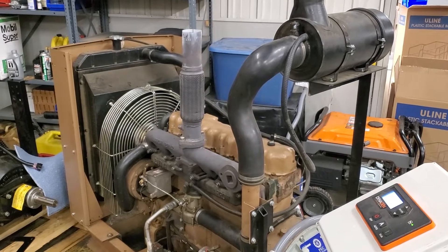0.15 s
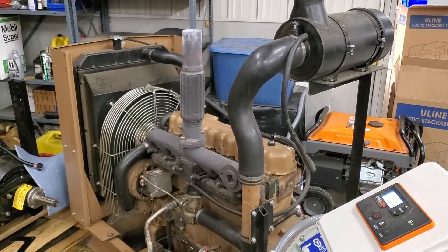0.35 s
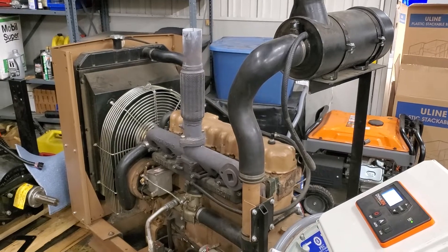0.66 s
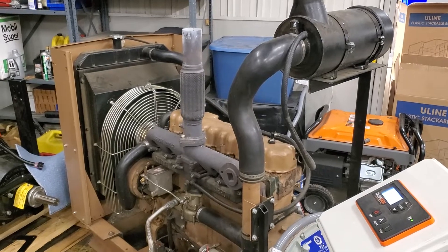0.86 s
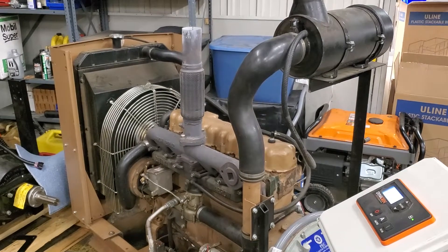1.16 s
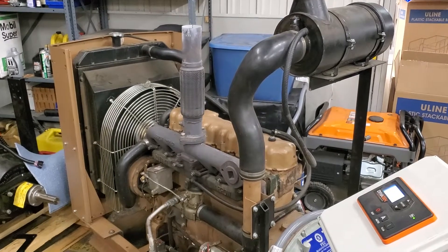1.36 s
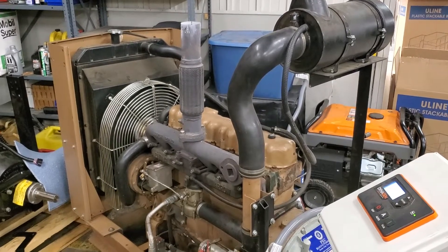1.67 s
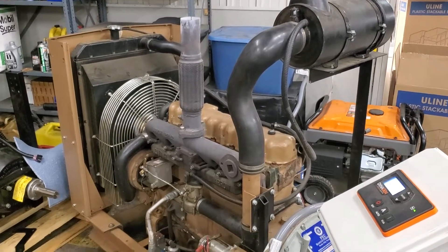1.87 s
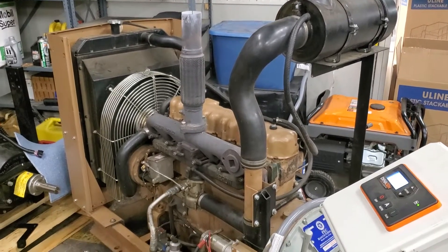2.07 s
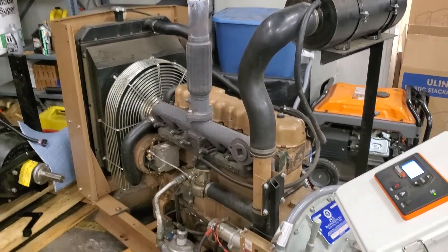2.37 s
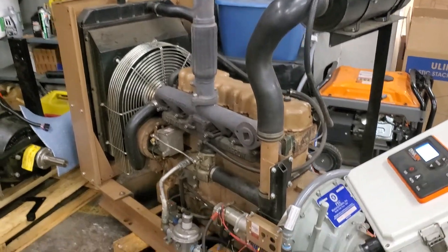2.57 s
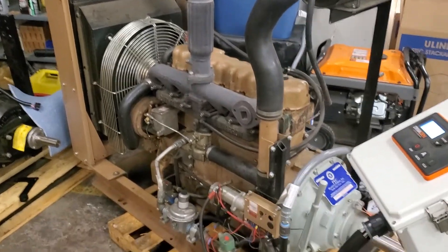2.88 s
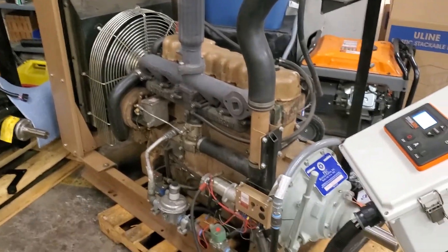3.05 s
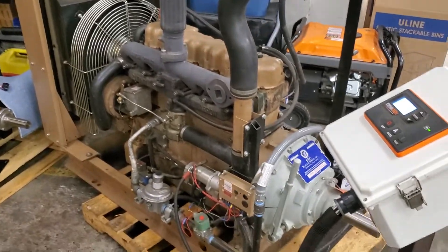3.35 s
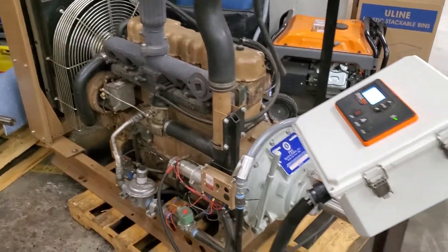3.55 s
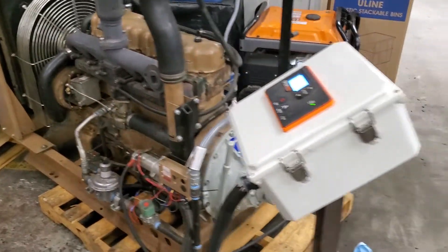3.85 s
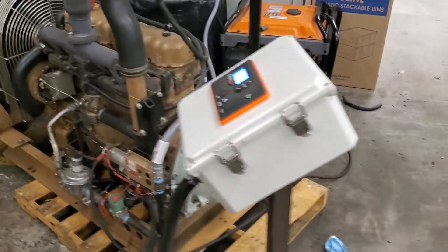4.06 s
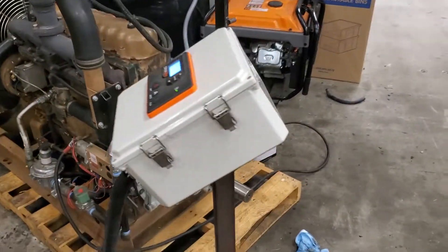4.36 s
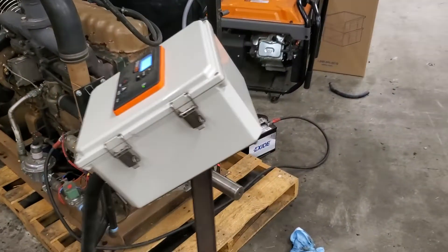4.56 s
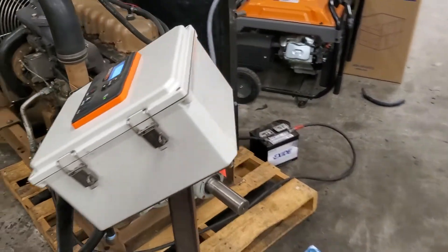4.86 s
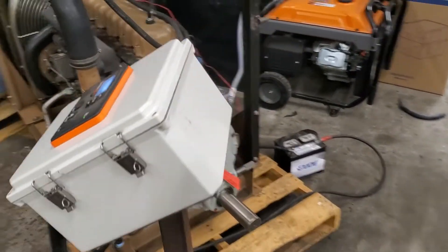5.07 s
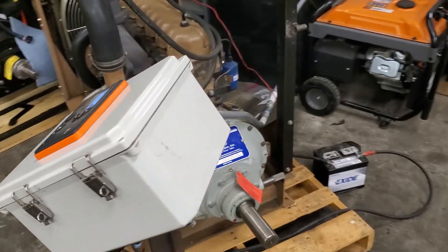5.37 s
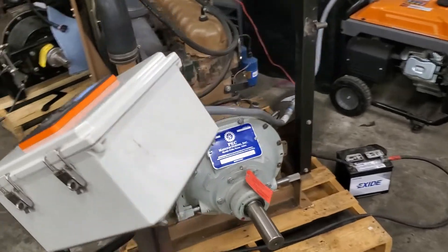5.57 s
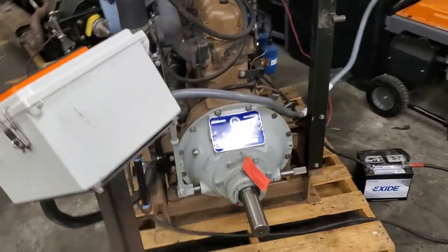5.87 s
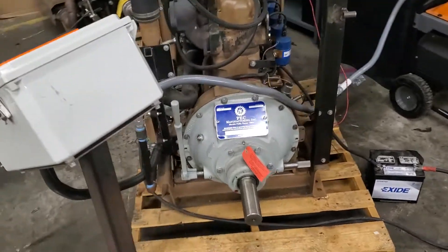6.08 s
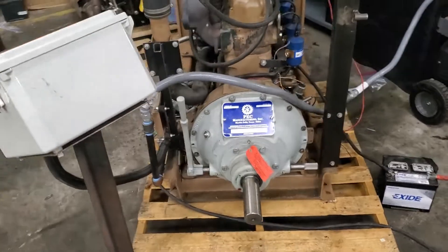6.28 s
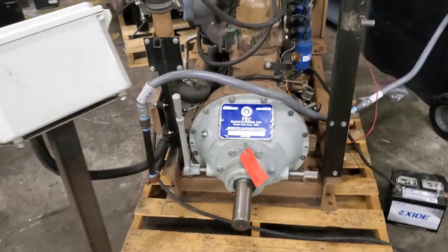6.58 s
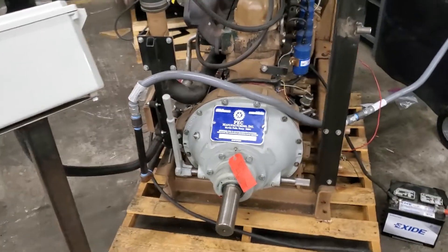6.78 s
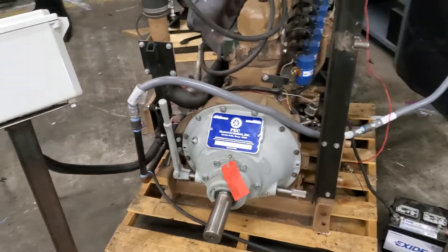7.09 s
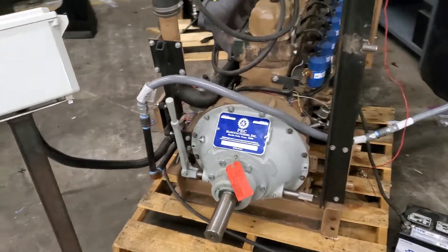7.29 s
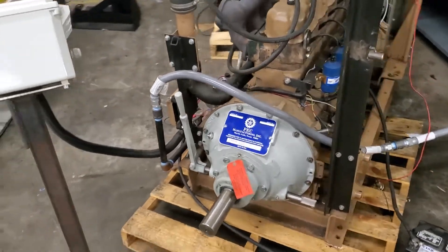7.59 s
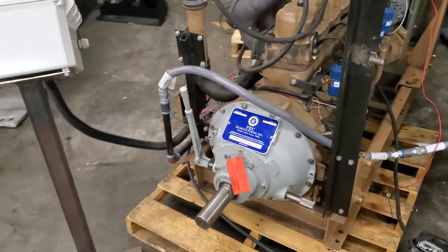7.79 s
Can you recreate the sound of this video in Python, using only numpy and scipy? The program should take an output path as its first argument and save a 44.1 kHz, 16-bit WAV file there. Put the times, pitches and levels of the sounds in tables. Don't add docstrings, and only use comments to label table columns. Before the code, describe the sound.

Loud continuous engine drone with deep exhaust boom, knocking block and rushing fan, its pitch sagging slightly as the listener walks around behind it.

```python
import sys
import numpy as np
from scipy import signal
from scipy.fft import rfft, irfft, next_fast_len
from scipy.io import wavfile
from scipy.ndimage import uniform_filter1d, map_coordinates

SR = 44100
rng = np.random.default_rng(int(sys.argv[2]) if len(sys.argv) > 2 else 0)


def transcribe(signal):
    frames = np.atleast_2d(signal).T
    limited = np.clip(frames, -1, 1)
    pcm = np.round(limited * 32767).astype(np.int16)
    wavfile.write(sys.argv[1], SR, pcm)


def elevation(decibels):
    levels = np.asarray(decibels, float)
    return 10 ** (levels / 20)


N = 349713


def rms_one(x):
    return x / np.sqrt(np.mean(x ** 2) + 1e-20)


def seconds(every=1):
    return np.arange(0, N, every) / SR


def in_time(rows):
    s, *columns = np.transpose(rows)
    return [np.interp(seconds(), s, column) for column in columns]


def at_hz(points):
    line_hz = np.maximum(np.fft.rfftfreq(next_fast_len(N), 1 / SR), 1)
    hz, value = np.transpose(points)
    return np.interp(np.log(line_hz), np.log(hz), value)


def filtered(x, gain):
    size = next_fast_len(N)
    return irfft(rfft(x, size) * gain, size)[..., :N]


def colour(x, spectrum):
    return filtered(x, elevation(at_hz(spectrum)))


def drift(rate_hz):
    r = np.exp(-200 * np.pi * rate_hz / SR)
    noise = rng.standard_normal(N // 100 + 3002)
    slow = signal.lfilter([1], [1, -2 * r, r * r], noise)[3000:]
    return np.interp(np.arange(N) / 100, np.arange(len(slow)), rms_one(slow))


# pitch in Hz, likeness from 0 to 1.
EAR_LIKENESS = [(60, 0.89), (290, 0.94), (640, 0.87), (1400, 0.29), (3100, 0.18), (6800, 0.0071),
                (15000, 0)]


def stereo_noise():
    alike = np.clip(at_hz(EAR_LIKENESS), 0, .999)
    mid, side = filtered(rng.standard_normal((2, N)), np.sqrt([1 + alike, 1 - alike]))
    return np.array([mid + side, mid - side]) / np.sqrt(2)


def contacts(cycles, table, scatter_db):
    trains = np.zeros((len(table), N))
    for train, (part, db) in zip(trains, table):
        at = np.flatnonzero(np.diff(np.floor(cycles - part)) > 0)
        train[at] = elevation(db + scatter_db * rng.standard_normal(len(at)))
    return trains


# crank order, time in
# seconds, depth in dB, half width in seconds.
NODES = [(12, .3, 1, 1.2), (12, 5.55, 5.8, 1.7), (28, 0, 6, .25), (28, 2.35, 9, .45), (28, 4.0, 7, .4),
         (28, 7.6, 8, .9), (30, 1.15, 24, 1.1), (30, 5.5, 9.5, 1.2), (48, 4.9, -7, .35), (53, 7.5, -7, .5),
         (55, 5.1, -5, .5), (57, 7.4, -9, .5), (69, 5.6, -3, .5),
         (15, 4.21, 7.5, 0.93), (18, 2.06, -6.7, 0.41), (20, 5.07, 14.0, 0.91),
              (21, 6.72, -14.0, 1.48), (22, 2.66, -11.8, 1.6), (24, 3.47, -7.1, 1.09),
              (25, 2.92, -7.1, 1.6), (26, 7.44, -9.2, 0.85), (27, 5.48, 14.0, 1.51), (32, 0.88, 14.0, 1.07),
              (36, 7.36, -13.0, 1.37), (41, 2.29, -14.0, 0.88), (48, 2.91, -9.2, 0.41),
              (53, 6.5, 13.7, 1.09), (54, 4.09, 14.0, 1.6), (55, 2.43, -10.3, 0.59),
              (57, 4.95, -14.0, 0.52), (58, 4.65, 13.1, 1.1), (61, 7.14, 8.6, 0.85), (62, 3.7, -8.0, 1.22),
              (63, 4.5, -13.9, 0.55), (64, 3.13, -13.0, 0.45), (65, 1.83, -7.9, 0.57),
              (67, 3.49, 14.0, 0.45), (69, 6.27, -5.5, 0.4), (71, 4.68, -7.7, 0.55), (72, 3.04, -5.5, 0.8),
              (73, 4.72, 14.0, 0.7)]


def standing(order, level_db, every=1):
    s = seconds(every)
    level_db = level_db + 0 * s
    for k, at, depth, width in NODES:
        if k == order:
            level_db = level_db - depth * np.exp(-((s - at) / width) ** 2)
    return level_db


def boom(firings, speed, boom_db, pan_db):
    octave_db = standing(order=12, level_db=-21.3)
    lead = .3 * (speed - 83.0)
    turn = 2 * np.pi * firings + 0.0084 * np.array([[-1], [1]])
    tone = elevation(boom_db) * np.cos(turn) + elevation(octave_db) * np.cos(2 * turn + lead)
    return np.sqrt(2) * tone * elevation(pan_db / 2 * np.array([[1], [-1]]))


# moment as a part of the cycle, knock level in dB.
CYLINDERS = [
    (.08, -2),
    (.265, -1),
    (.41, -5),
    (.6, -4),
    (.77, 0),
    (.91, -1),
]
# multiple of the cycle rate, rms in dB beside, rms in dB
CRANK_ORDERS = [(4, -55.6, -58.5), (7, -54.9, -46.4), (11, -49.7, -58.6), (14, -43.2, -43.9),
                (15, -51.4, -41.5), (16, -42.3, -47.1), (18, -38.1, -36.4), (20, -41.8, -33.1),
                (21, -47.0, -56.3), (22, -49.1, -50.3), (24, -41.7, -47.2), (25, -52.7, -40.6),
                (26, -51.4, -48.6), (27, -53.2, -35.6), (29, -40.5, -53.0), (31, -55.5, -48.2),
                (32, -38.1, -44.6), (33, -60.0, -45.9), (36, -55.3, -55.4),
                (40, -52.7, -40.0), (41, -60.0, -47.1), (42, -58.9, -44.4), (46, -52.6, -48.4),
                (48, -45.2, -46.9), (49, -52.7, -51.7), (50, -49.2, -48.1), (51, -47.0, -60.0),
                (52, -50.8, -60.0), (53, -48.5, -37.2), (54, -52.7, -41.2), (55, -54.6, -43.6),
                (56, -44.8, -43.7), (57, -47.7, -56.5), (58, -47.3, -38.9), (59, -40.8, -48.3),
                (60, -42.0, -53.2), (61, -43.1, -40.0), (62, -46.8, -52.5), (63, -46.1, -51.6),
                (64, -58.5, -50.2), (65, -47.4, -46.6), (66, -47.7, -60.0), (67, -41.0, -41.1),
                (68, -46.9, -55.0), (69, -49.1, -40.9), (71, -50.7, -45.8), (72, -43.4, -48.9),
                (73, -51.7, -42.3), (75, -60.0, -51.5)]


def hum(cycles, accent_db, behind):
    every = 10
    cycles, accent_db, behind = cycles[::every], accent_db[::every], behind[::every]
    paths = np.array([drift(.25)[::every] for _ in range(8)])
    pipe = elevation(standing(28, -36.5, every)) * np.cos(2 * np.pi * 28 * cycles + 3 + .4 * paths[0])
    fifth = elevation(standing(30, -33, every)) * np.cos(2 * np.pi * 30 * cycles + 1 + .4 * paths[1])
    out = (pipe + fifth) * np.ones((2, 1))
    spread = 110 - 4.5 * accent_db
    loud_part = CYLINDERS[4][0]
    for k, beside_db, behind_db in CRANK_ORDERS:
        a, b, c = paths[rng.permutation(8)[:3]]
        phase = 2 * np.pi * k * (cycles - loud_part)
        phase += spread / k * rng.standard_normal() + k / 130 * a
        apart = k / 120 * b * [[1], [-1]]
        level_db = standing(k, beside_db + (behind_db - beside_db) * behind, every)
        out += elevation(level_db + 1.2 * c + .5) * np.cos(phase + apart)
    return np.sqrt(2) * signal.resample_poly(out, every, 1, axis=1)[:, :N]


def hall(x, count):
    length, t60_s = SR // 3, 0.4
    out, spot = np.zeros((2, N)), np.arange(N) / N * (count - 1)
    fade = elevation(-60 * np.arange(length) / SR / t60_s)
    for k in range(count):
        shared, left, right = rng.standard_normal((3, length)) * fade
        echoes = np.array([shared + 0.58 * left, shared + 0.35 * right]) / np.sqrt(np.sum(fade ** 2))
        near = np.flatnonzero(abs(spot - k) < 1)
        heard = x[None, max(near[0] - length, 0):near[-1] + 1]
        wet = signal.fftconvolve(heard, echoes)[:, :heard.shape[1]]
        out[:, near] += wet[:, -len(near):] * np.cos(np.pi / 2 * (spot[near] - k))
    return out


# pitch in Hz, level in dB per Hz.
BLOCK_BESIDE = [(450, -30), (540, -4), (680, -14), (780, -17), (850, 11), (950, 6), (1020, 8.5),
                (1150, -3.5), (1500, -20), (3000, -11), (4500, -34)]
# pitch in Hz, level in dB per Hz.
BLOCK_BEHIND = [(450, -25), (540, -1), (620, -7), (740, -3), (850, 2.5), (950, 2), (1000, -2), (1150, -14),
                (1500, -18), (3000, -29), (4500, -47)]


def knock(cycles, knock_db, accent_db, behind):
    trains = contacts(cycles, CYLINDERS, scatter_db=1.5)
    trains[4] *= elevation(accent_db)
    for train in trains:
        train *= elevation(2.0 * drift(0.98))
    strikes = trains.sum(0)
    blows = (1 - behind) * colour(strikes, BLOCK_BESIDE) + behind * colour(strikes, BLOCK_BEHIND)
    return elevation(knock_db - 4.5) * rms_one(blows + hall(blows, count=6))


# pitch in Hz, level in dB per Hz.
NOISE_BESIDE = [(15, -3), (35, 4), (62, 9), (90, 9), (120, 3), (200, 3), (300, 9), (400, 6), (480, 3),
                (620, 3), (950, 4),
                (1150, 0), (1550, 1), (2250, 1), (2550, 1.5), (2900, -4.5), (3400, -2), (3800, -9),
               (4600, -14), (5600, -19.5), (7500, -23), (9800, -26), (11500, -23.5), (12600, -23),
               (16000, -25)]
# pitch in Hz, level in dB per Hz.
NOISE_BEHIND = [(15, -3), (35, 5), (62, 10), (90, 9), (120, 4), (200, 4), (300, 10), (400, 8), (480, 5),
                (620, 5), (950, 3),
                (1150, 3), (1550, -3), (2000, 0), (2400, -3), (2850, -1.5), (3400, -5.5), (4000, -7.5),
               (4700, -12), (5600, -15), (7500, -16.5), (9800, -23), (11500, -19), (12600, -20),
               (16000, -25)]


def roar(near_db, behind):
    roar_db = -32.5 + near_db
    clear = (1 + np.tanh((seconds() - 3.03) / .05)) / 2
    hiss_db = -51.5 + 2.5 * clear + 0.37 * near_db
    noise = stereo_noise()
    mixed = (1 - behind) * colour(noise, NOISE_BESIDE)
    mixed += behind * colour(noise, NOISE_BEHIND)
    hiss = signal.sosfilt(signal.butter(2, [4200, 9500], "band", fs=SR, output="sos"), mixed)
    lift = elevation(hiss_db - roar_db + 18.5 - 4.2 * behind) - 1
    return (mixed + lift * hiss) * elevation(roar_db + 12.5 + 0.29 * drift(9.7))


# time in seconds, change in dB.
SURGES = [(.01, -11), (.29, -4), (.41, 3), (.58, -4), (.89, -4), (1.11, -4), (1.33, -8), (1.72, -8),
          (1.9, -5), (2.04, 4.5), (2.45, 4), (2.6, -6), (2.9, 4.5), (3.18, 8.5), (3.6, 6), (3.9, 5.5),
          (4.2, 0), (4.36, 4.5), (4.74, -4), (5.12, -4), (5.26, -4), (5.39, 5), (5.5, -5), (5.78, 4.5),
          (6.4, -4), (6.48, 2.5), (6.84, 2), (7.15, -12), (7.3, 5.5), (7.63, -9)]


def howl(cycles):
    fan_order, width_hz, surge_s = 18.9, 16, 0.065
    gusts = drift(width_hz) + 1j * drift(width_hz)
    gusts = gusts / np.sqrt(uniform_filter1d(abs(gusts) ** 2, size=SR // 8))
    level_db = -29 + sum(db * np.exp(-((seconds() - s) / surge_s) ** 2) for s, db in SURGES)
    return elevation(level_db) * np.sqrt(2) * np.real(gusts * np.exp(2j * np.pi * fan_order * cycles))


# moment as a part of the cycle, tick level in dB.
VALVES = [
    (.04, 7),
    (.26, 5),
    (.39, -3),
    (.54, -11),
    (.7, 7),
    (.78, -3),
    (.95, -11),
]


def ticks(cycles):
    r = elevation(-60 / (0.043 * SR))
    clicks = contacts(cycles, VALVES, scatter_db=2.0).sum(0)
    bursts = signal.lfilter([1], [1, -r], clicks + 1e-18)
    metal = [(1200, -18), (3000, -8), (5500, -24), (9800, -27), (11400, -5), (13000, -16), (16000, -10)]
    return elevation(-36.0) * bursts * colour(stereo_noise(), metal)


# time in seconds, firings per second, boom level in dB.
RUN = [(0.0, 86.511, -9.3), (0.45, 85.755, -9.4), (0.81, 86.12, -9.5), (1.62, 85.43, -9.4),
       (1.97, 84.648, -9.6), (2.28, 84.574, -9.6), (2.97, 83.723, -9.8), (3.66, 82.972, -10.2),
       (3.9, 83.021, -10.2), (4.32, 82.691, -10.6), (4.83, 82.823, -10.1), (5.01, 82.753, -9.7),
       (5.6, 82.359, -9.0), (6.18, 81.699, -9.7), (6.7, 81.509, -9.7), (7.05, 80.99, -10.2),
       (7.51, 81.157, -9.7), (7.93, 80.444, -9.8)]
# time in seconds, nearness in dB, knock level in dB, loud cylinder's lift in dB.
WALK = [(0, -0.5, -36, 0.5), (1.3, -0.5, -35, -0.5), (2, 0, -29, 2.5), (3.1, -.5, -29, 0.5),
        (4.05, -1, -36, 5.5), (4.2, -1.5, -28, 8), (4.7, -1, -30.5, 8.5), (5.1, -1, -35, 8.5),
        (5.6, -1.5, -27, 3.5), (6.4, -1, -28, 4.5), (7.93, -0.5, -34, 4.5)]
# time in seconds, behind from 0 to 1, left ear's lead in samples, boom left over right in dB.
TURN = [
    (0, 0, 2, -.1),
    (1.5, .1, 2, -.2),
    (2.5, .2, 2.5, -.3),
    (3.5, .7, 3.5, -.3),
    (4.5, .9, 6, -.2),
    (5.5, .8, 2.5, -.6),
    (6.5, .9, -1.5, -.8),
    (7.93, 1, -4, -.8),
]
# pitch in Hz, left over right in dB.
TILT = [(60, 2), (110, 5), (200, -1), (380, -0.5), (700, -2.5), (1290, -2.0), (2380, -2), (4400, 0),
        (8120, -2.0), (15000, -1)]


def scene():
    speed, boom_db = in_time(RUN)
    near_db, knock_db, accent_db = in_time(WALK)
    behind, lead, pan_db = in_time(TURN)
    behind = np.clip(behind, 0, 1)
    firings = -.341 + np.cumsum(speed) / SR
    cycles = firings / 6
    upper = hum(cycles, accent_db, behind)
    upper += knock(cycles, knock_db, accent_db, behind)
    upper += roar(near_db, behind) + howl(cycles) + ticks(cycles)
    left, right = filtered(upper, elevation(at_hz(TILT) / 2 * [[1], [-1]]))
    left = map_coordinates(left, [np.arange(N) + lead], order=1, mode="nearest")
    return boom(firings, speed, boom_db, pan_db) + [left, right]


def low_pass(x):
    return signal.sosfilt(signal.butter(12, 15720, fs=SR, output="sos"), x)


def record(dry):
    ceiling = 1.02
    mix = dry / (1 + (dry / ceiling) ** 8) ** (1 / 8)
    return low_pass(mix)


dry = scene()
out = record(dry)
transcribe(out)
```